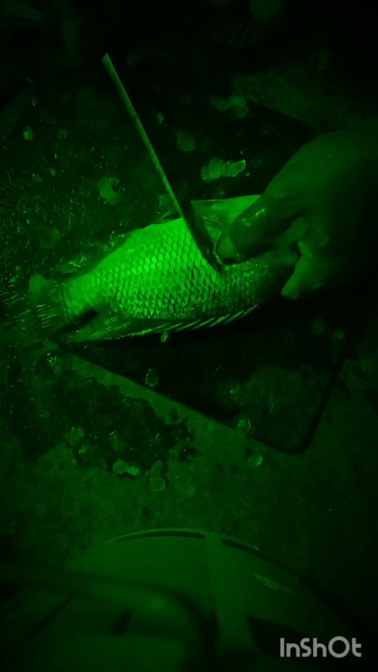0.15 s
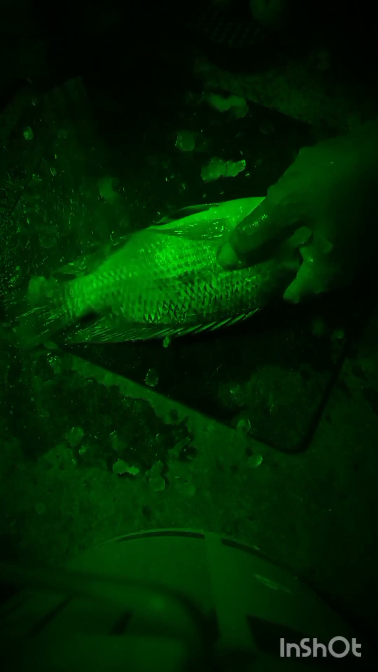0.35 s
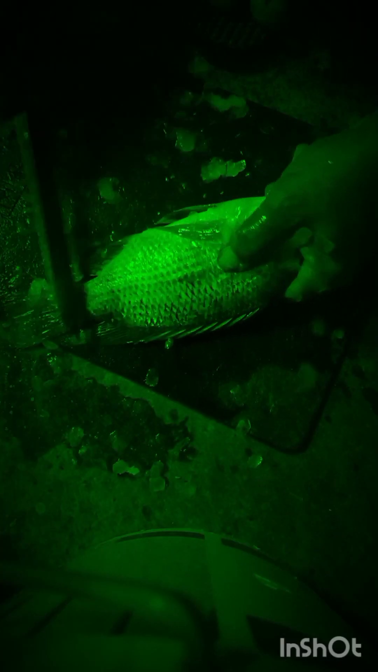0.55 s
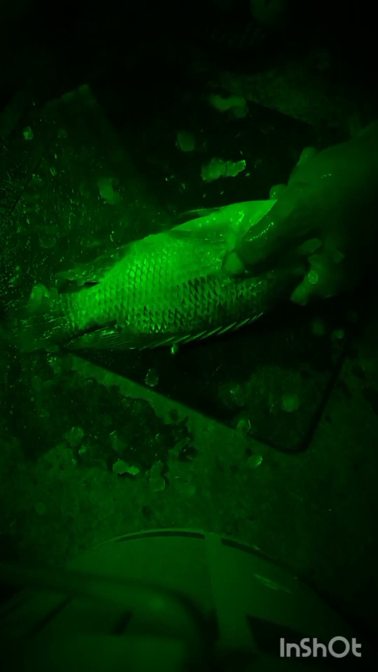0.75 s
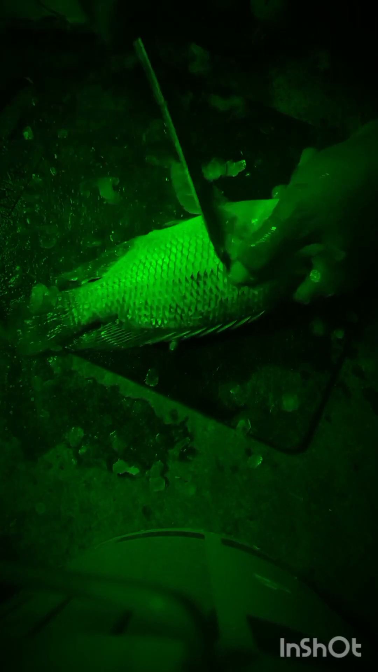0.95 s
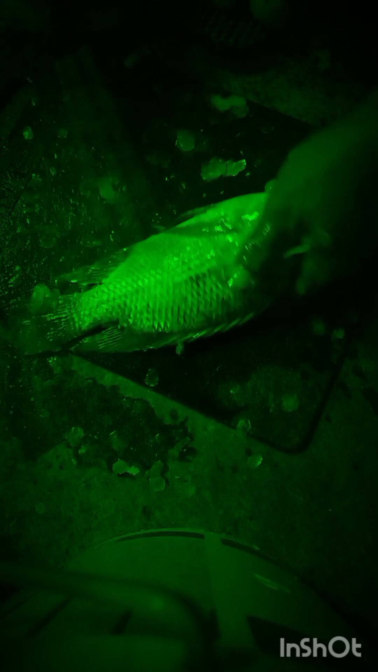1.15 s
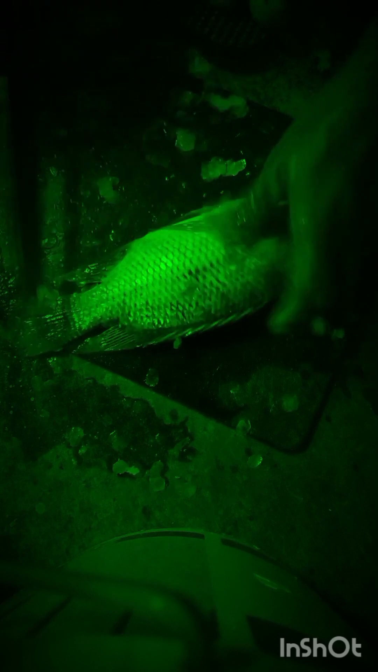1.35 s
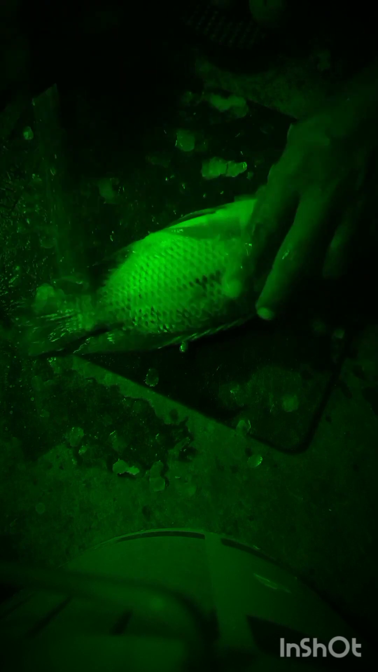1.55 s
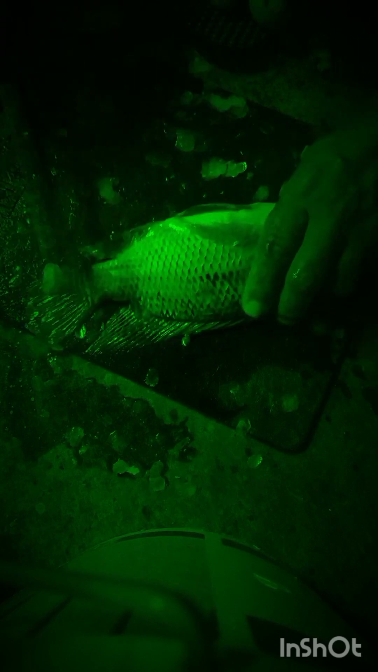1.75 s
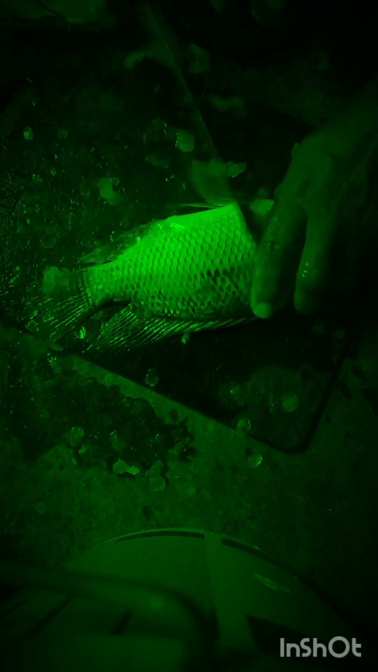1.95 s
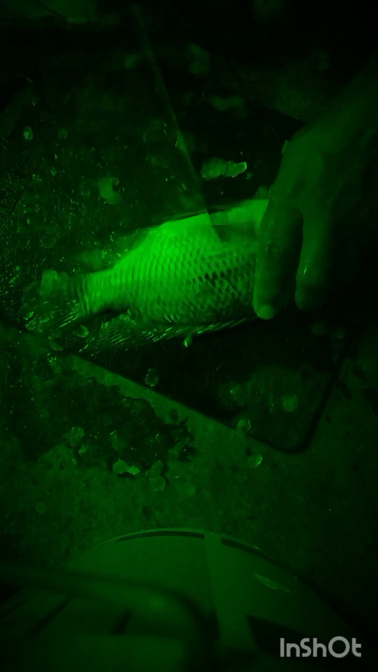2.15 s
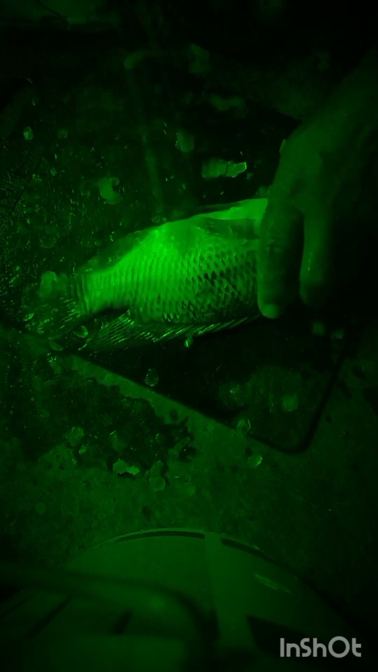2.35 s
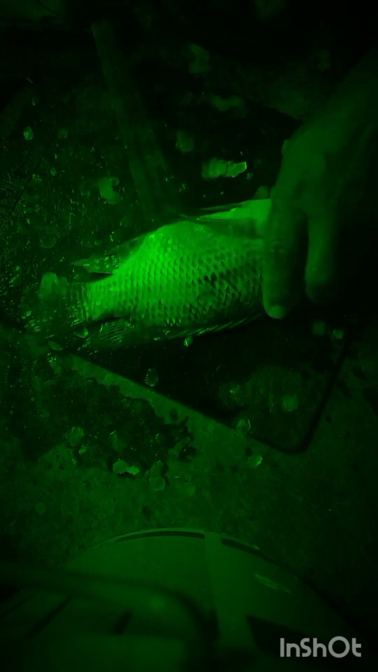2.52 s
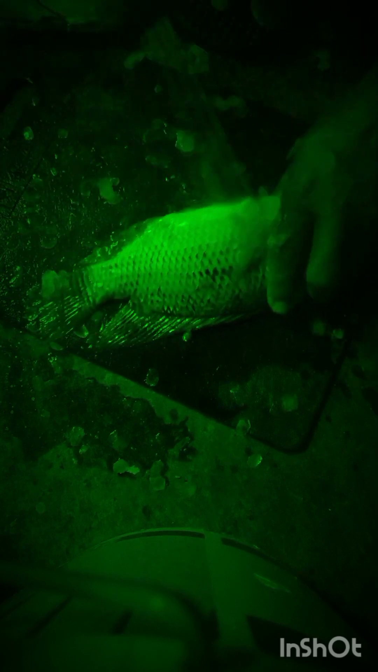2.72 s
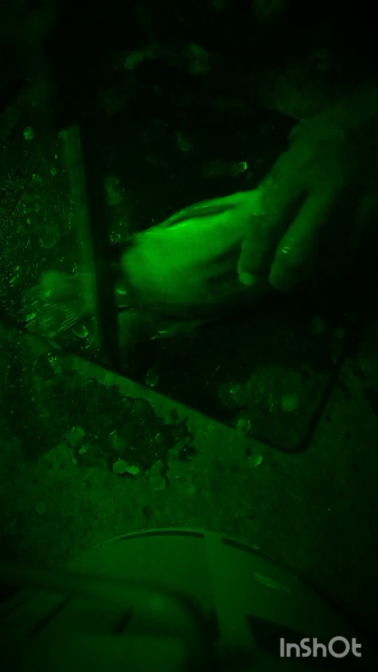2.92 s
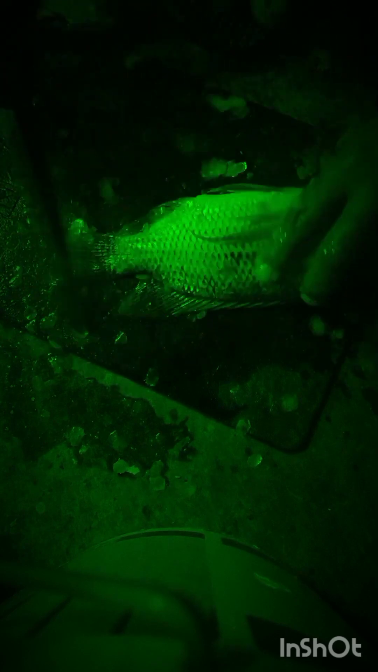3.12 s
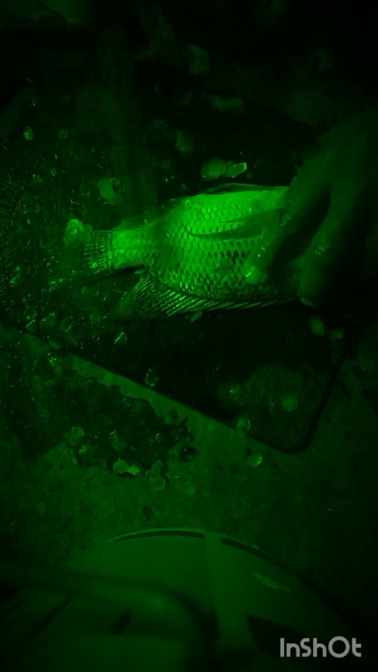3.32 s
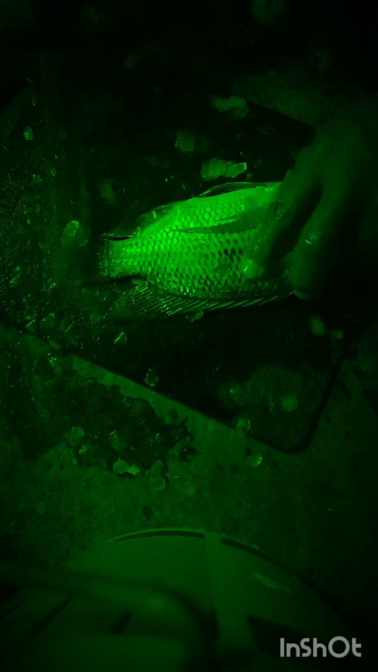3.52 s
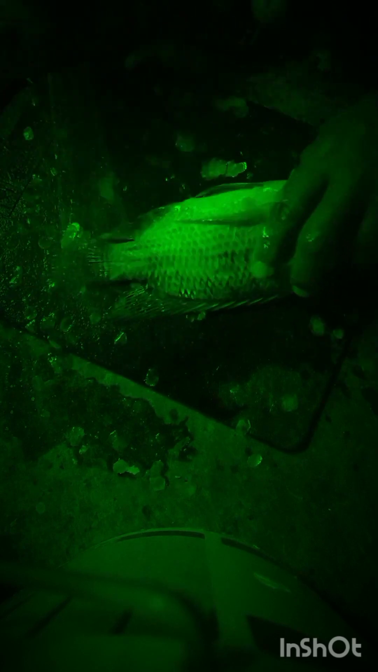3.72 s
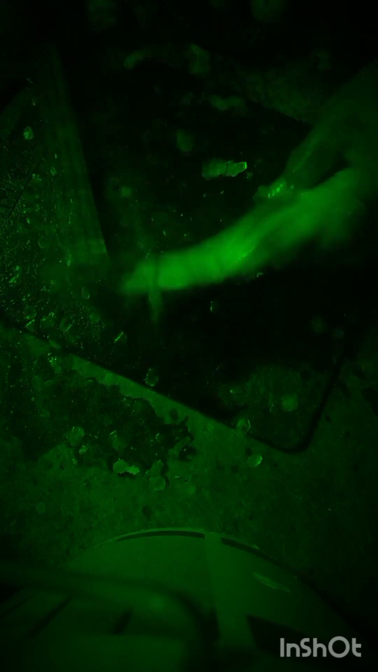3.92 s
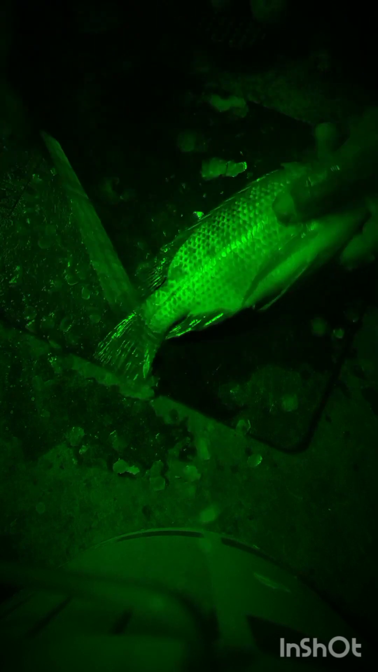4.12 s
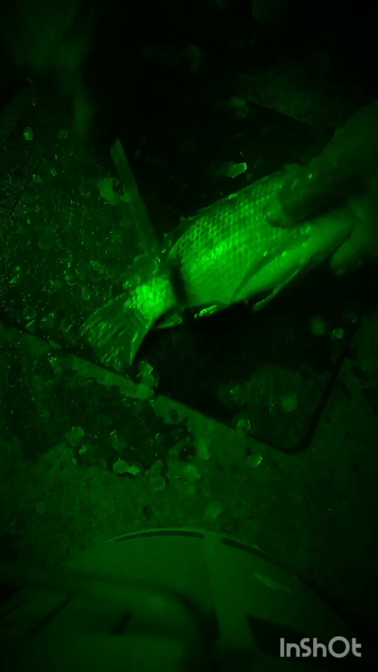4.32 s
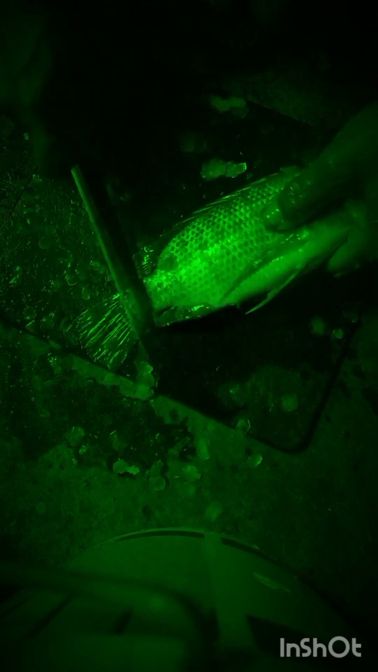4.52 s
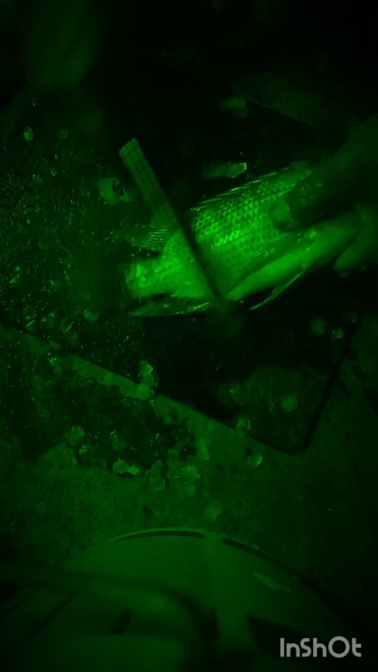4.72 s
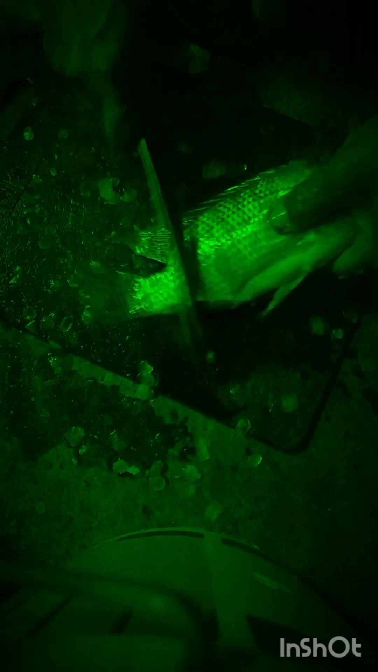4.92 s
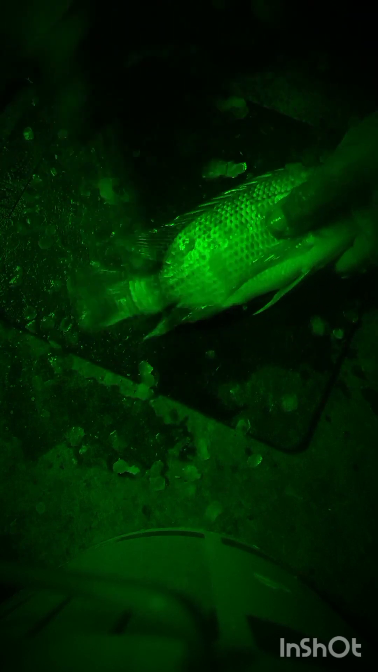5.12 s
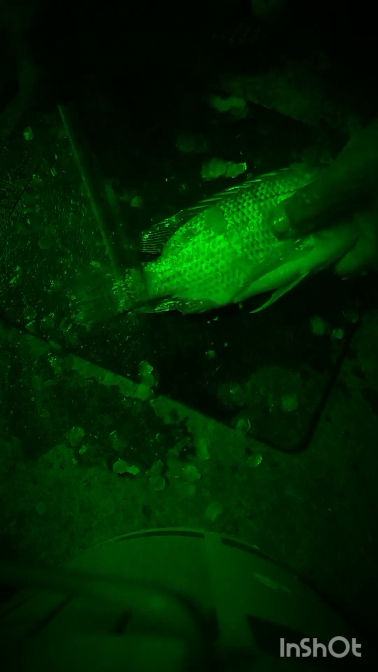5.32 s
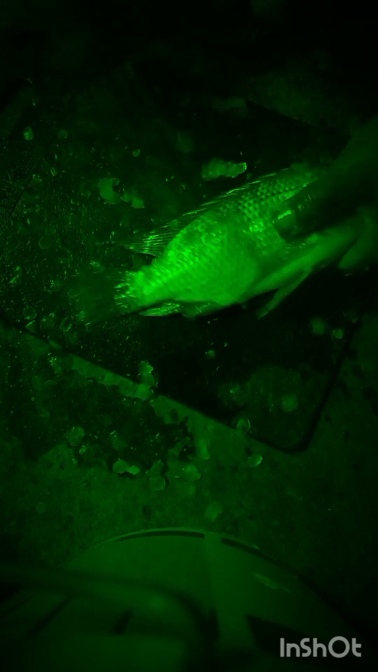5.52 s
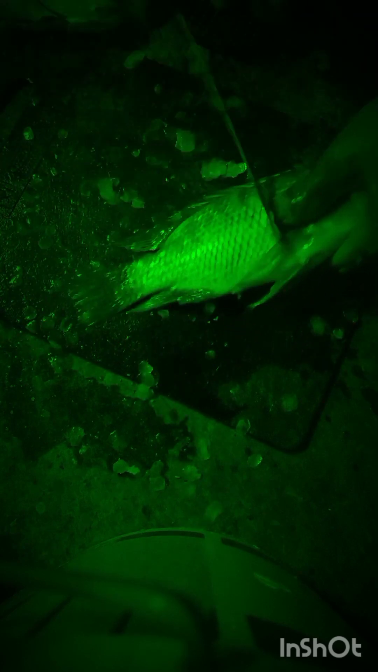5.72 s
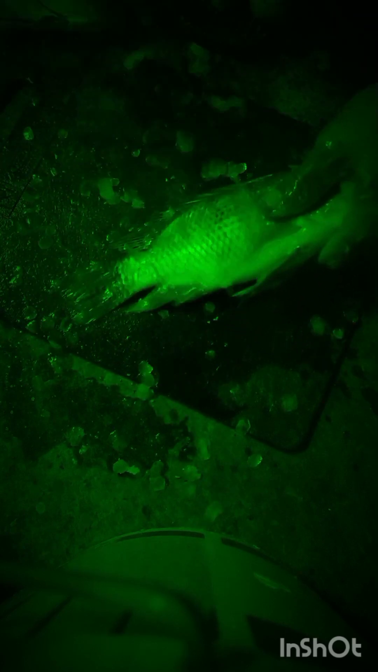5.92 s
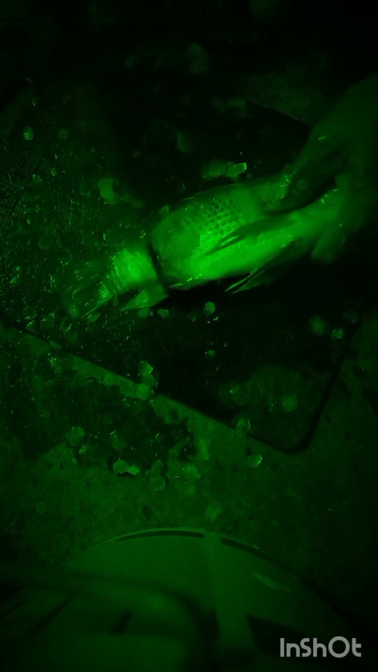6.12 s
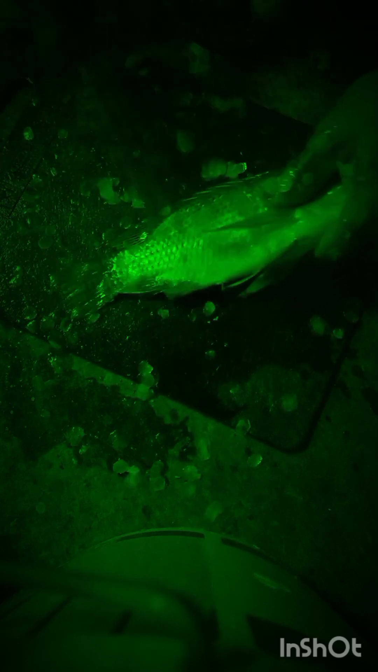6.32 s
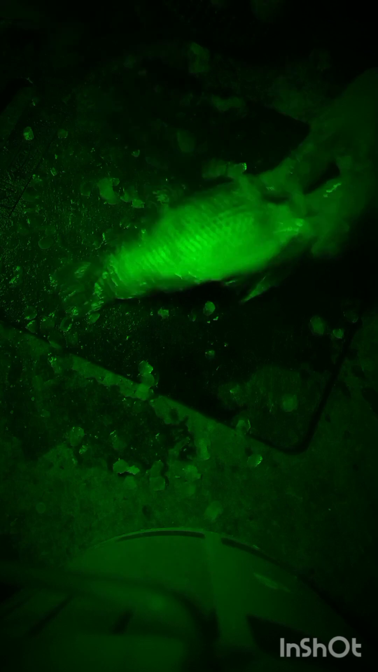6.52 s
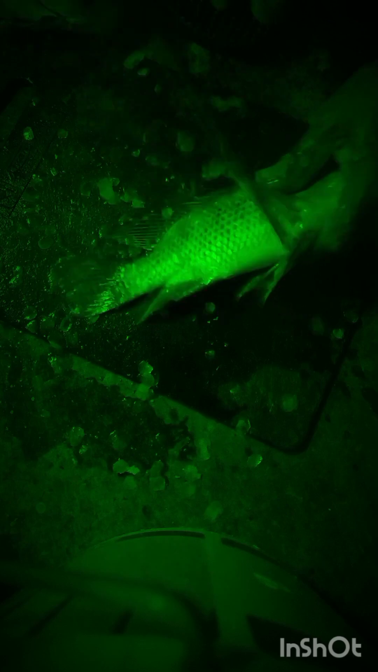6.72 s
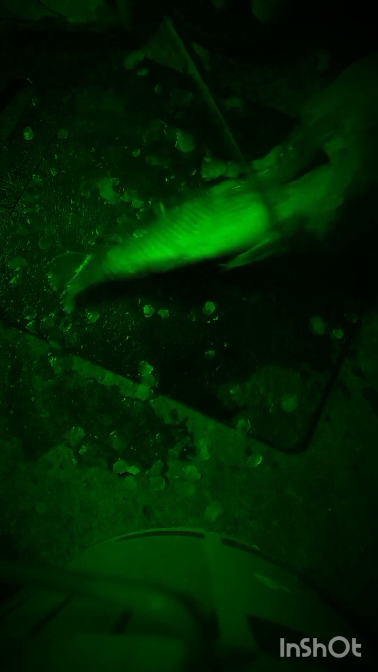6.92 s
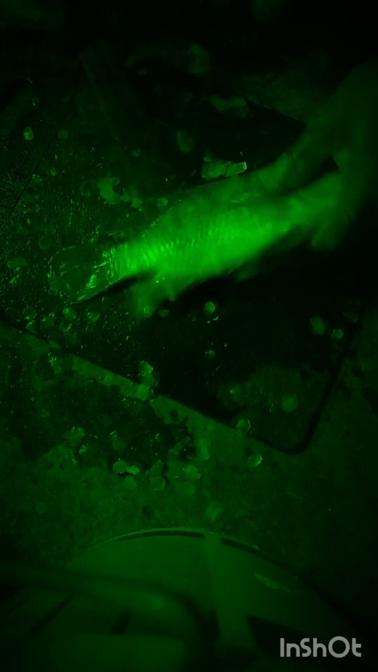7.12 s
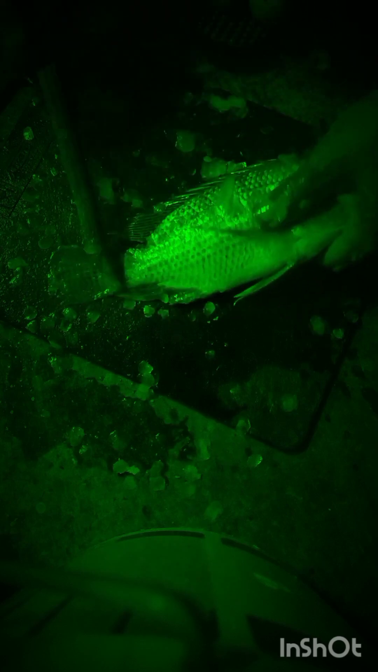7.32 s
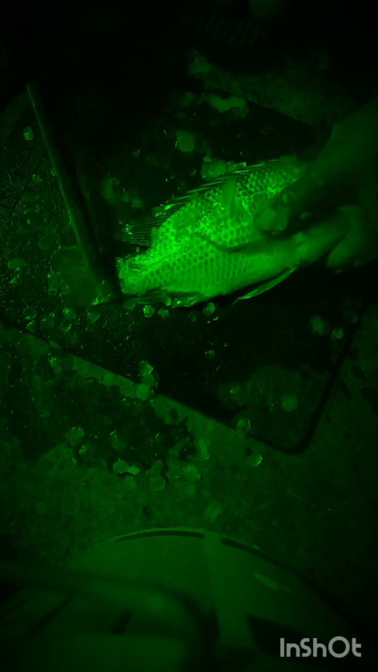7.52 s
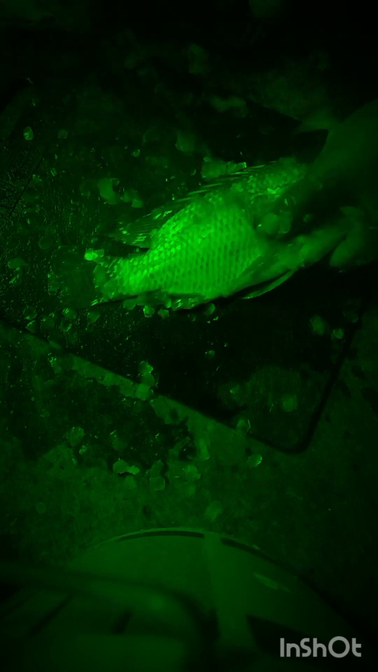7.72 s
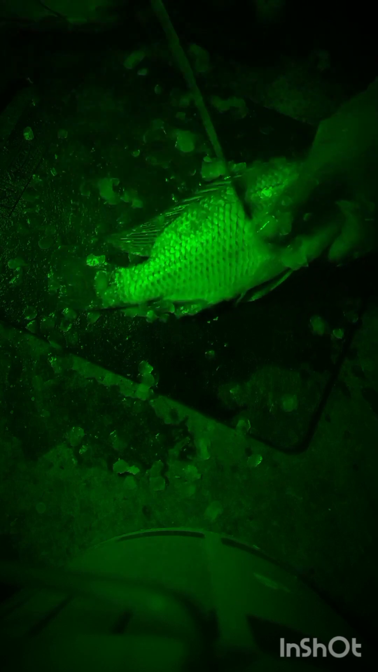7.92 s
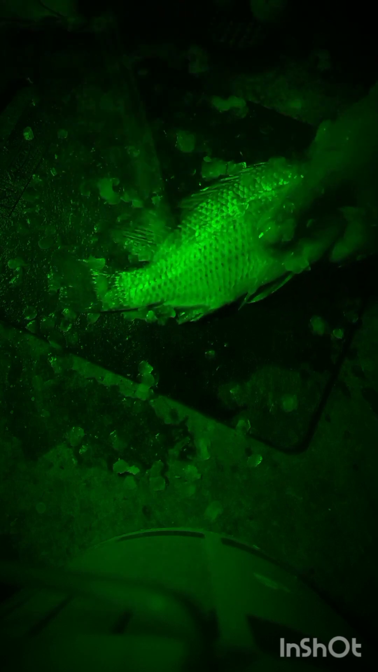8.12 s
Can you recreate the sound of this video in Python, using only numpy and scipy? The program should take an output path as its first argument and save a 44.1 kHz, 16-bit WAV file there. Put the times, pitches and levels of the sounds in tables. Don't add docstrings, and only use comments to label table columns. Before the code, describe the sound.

Outdoors at night, a knife scrapes scales off a fish in rapid short strokes, very close. Each stroke crackles with popping scales, makes the thin blade sing and gives the small wooden board a woody ring with a fleshy thump. The strokes pause and soften around the third second, then grow harder and denser. Insects throb steadily behind, with a faint far motor. Wide stereo, left thin and bright, right duller.

```python
import sys
import numpy as np
from scipy import signal
from scipy.fft import rfft, irfft, next_fast_len
from scipy.io import wavfile
from scipy.ndimage import uniform_filter1d, map_coordinates

SR = 44100
rng = np.random.default_rng(int(sys.argv[2]) if len(sys.argv) > 2 else 0)


def to_linear_factor(level_db):
    exponent = np.asarray(level_db, float) / 20
    return 10 ** exponent


def wrap_up_sound(samples):
    columns = np.atleast_2d(samples).T
    tamed = np.clip(columns, -1, 1)
    steps = np.round(tamed * 32767).astype(np.int16)
    wavfile.write(sys.argv[1], SR, steps)


N = 359756
TIME_S = np.arange(N) / SR

# peak in seconds, level in dB, rise in ms, fall in ms.
PUSHES = [(0.137, -32.5, 31, 66), (0.192, -29.5, 60, 27), (0.416, -30, 46, 65), (0.723, -31, 55, 29),
          (0.949, -30, 33, 61), (1.222, -37, 54, 51), (1.638, -32, 14, 53), (1.982, -34.5, 38, 25),
          (2.196, -28.5, 23.3, 31), (2.432, -37, 24, 37), (2.657, -45.5, 41, 26), (3.187, -37, 30, 51),
          (3.394, -34, 74, 41), (3.63, -31, 40, 58), (3.87, -42, 144, 100), (4.41, -28.5, 59.5, 46),
          (4.691, -23, 57, 39), (4.919, -32, 63, 120), (5.196, -29, 44, 51), (5.272, -23.5, 115, 25.5),
          (5.462, -29.5, 61, 86), (5.72, -32.5, 43, 51), (5.765, -24.5, 28, 26), (5.966, -24.5, 23.6, 43),
          (6.219, -29, 17, 48.5), (6.476, -31.5, 32.5, 23), (6.69, -32, 39, 42), (6.919, -35, 23, 52),
          (7.18, -35.5, 35, 47), (7.439, -31.5, 47, 47), (7.689, -29, 77, 39), (7.957, -24.5, 66, 18)]
PUSH_STEEL_DB = [3, 1, 5, 1.5, 0.5, 5, -4, 4.5, 4.5, 3.5, 6, 1.5, -5, -5, -2, 5.3, -6, 2, -5, -2, -1, -4,
                 -1, -0.5, -4, 14, -20, -3.5, 2, -10.5, -5.5, 0]
STEEL_HISS_HZ = (4640, 7600)
# peak in seconds, level in dB, length in ms, board level in dB.
RETURNS = [(0.034, -45, 85, -67), (0.31, -44.5, 124, -46), (0.586, -48.5, 270, -48),
           (0.844, -50.5, 260, -54), (1.081, -47.5, 65, -52.5), (1.776, -50, 70, -59),
           (2.1, -47.5, 150, -63), (2.353, -44.5, 73, -58.5), (2.553, -54.5, 190, -92),
           (3.059, -46, 70, -40), (3.777, -46.5, 69, -46), (3.949, -43.5, 43, -45.5),
           (4.059, -48.5, 48, -52), (4.577, -28.5, 85, -51), (4.812, -32, 90, -40.5), (5.063, -29, 42, -55),
           (5.364, -39.5, 75, -36), (5.61, -38, 53, -40), (5.873, -42, 94, -50.5),
           (6.109, -35.5, 53, -50.5), (6.382, -46, 98, -63), (6.599, -36.5, 65, -57.5),
           (6.831, -36.5, 77, -57), (7.072, -48, 61, -56), (7.313, -54, 92, -60), (7.567, -37.5, 78, -38),
           (7.83, -48, 86, -45), (8.104, -47, 140, -62)]
# peak in seconds, level in dB, fall in ms, lean to the left in dB.
CATCHES = [(0.512, -50, 10, 21), (0.531, -38, 8.4, 7), (0.611, -48, 17, 20), (0.907, -32.5, 4.9, 9),
           (1.183, -34, 9.9, 0), (1.316, -51, 10, 12), (1.436, -63, 13, 18), (1.705, -40.5, 14, 17),
           (2.39, -41.5, 12, 8), (2.412, -43, 11, -9), (2.587, -50.5, 13, 15), (2.622, -47, 7.1, 11),
           (2.696, -41.5, 68, -2.5), (2.971, -43.5, 52, -1.5), (3.036, -43, 12, -3), (3.35, -36.5, 4.1, 12),
           (4.266, -40, 37, 7), (4.54, -30, 27, 9), (4.845, -26, 20, 10.5), (4.989, -27.5, 9.8, 10.5),
           (5.1, -29.5, 30, 3.5), (5.387, -34.5, 8.1, 8), (5.508, -31, 11, 3), (5.562, -42, 10, 0),
           (5.632, -34, 13, 1), (6.171, -33.5, 32, 2), (7.104, -38, 15, 3), (7.343, -46.5, 20, 14),
           (7.787, -37, 18, 3), (7.988, -36.5, 13, 9)]
# time in seconds, centre of the board's ring in Hz,
# flesh under the edge in dB, brightness of the pushes in dB.
SPOTS = [(0.15, 850, 4.5, 3), (0.45, 980, -3, -9), (0.96, 1000, -2, -11.5), (1.25, 845, -0.5, -12),
         (1.6, 980, -1.5, -13), (2.0, 740, 3, -9), (2.3, 710, 4.5, 7), (2.7, 900, 4.5, 9),
         (3.17, 850, -17, -22), (3.4, 955, -6, -7), (3.9, 1020, -5.5, -16), (4.4, 1056, 0, -7.5),
         (5.2, 1077, -1, -7.5), (5.75, 1050, -5, -13), (6.2, 840, 4.5, -12), (7.2, 640, 4, -1),
         (7.43, 1010, -4.5, -2), (7.95, 1040, 1, -4.5)]
# frequency in Hz, level in dB.
SCALE_SPECTRUM = [(250, -16), (800, -10.5), (1600, -9), (2600, -4), (16000, 6.5)]
# frequency in Hz, width in Hz, level in dB.
STEEL_MODES = [(5220, 175, 1), (6684, 190, 9), (10770, 89, 1.5)]
# time in seconds, peak in dB, tone in Hz.
SNAPS = [(0.0966, -41, 6780), (0.1068, -29, 6000), (0.1155, -25, 6720), (0.1954, -26, 5520),
         (0.3071, -32, 6800), (0.389, -28, 5240), (0.4144, -22, 6970), (0.6713, -28, 5200),
         (0.7261, -25, 6090), (0.9037, -33, 6020), (1.209, -25, 6250), (1.6261, -30, 5310),
         (1.9793, -31, 5400), (2.1813, -24, 5490), (2.1878, -24, 6450), (2.1908, -23, 5150),
         (2.3405, -35, 6800), (2.4088, -35, 6460), (2.4268, -33, 6100), (3.3791, -33, 4070),
         (4.2606, -38, 6470), (4.3963, -26, 6800), (4.4582, -32, 6550), (4.5405, -20, 6160),
         (4.6358, -28, 6130), (4.6497, -23, 6230), (4.6878, -19, 5560), (4.6936, -18, 6700),
         (4.7546, -32, 6680), (4.7829, -27, 6690), (4.803, -23, 6680), (4.8383, -24, 6050),
         (4.8554, -23, 5260), (4.9076, -25, 5320), (4.966, -27, 5930), (4.9865, -24, 5220),
         (5.0628, -29, 6710), (5.0992, -26, 6770), (5.184, -26, 6700), (5.2564, -23, 5220),
         (5.3521, -33, 6830), (5.4265, -29, 5150), (5.4745, -23, 5420), (5.5048, -27, 5250),
         (5.5118, -27, 5970), (5.5288, -30, 5980), (5.5617, -34, 3780), (5.7622, -22, 5540),
         (5.7978, -36, 6400), (5.9318, -26, 5220), (5.9627, -24, 6760), (6.1698, -34, 6700),
         (6.4521, -29, 3920), (6.6487, -36, 5840), (6.9056, -34, 6680), (7.1027, -29, 6040),
         (7.157, -31, 5860), (7.5656, -20, 6420), (7.7023, -27, 6600), (7.9608, -22, 5570)]
# time in seconds, peak in dB.
TICKS = [(0.0304, -41), (0.2069, -34), (0.5089, -40), (0.5134, -40), (0.5302, -40), (0.5801, -41),
         (0.6127, -44), (0.7323, -31), (0.7455, -37), (0.8362, -44), (1.1282, -43), (1.2046, -35),
         (1.316, -47), (1.7092, -39), (2.0393, -48), (2.6221, -47), (2.6419, -44), (2.696, -42),
         (3.3536, -39), (4.7189, -31), (4.73, -32), (4.9263, -28), (4.9945, -31), (5.0664, -31),
         (5.1034, -30), (5.4798, -29), (6.1109, -38), (6.5775, -39), (6.5834, -37), (6.6002, -39),
         (6.7275, -38), (6.812, -38), (6.8193, -39), (6.845, -39), (6.9643, -42), (7.1089, -41),
         (7.3435, -43), (7.4758, -39), (7.543, -37), (7.5472, -36), (7.5619, -34), (7.7892, -40),
         (7.9935, -36), (8.1064, -43)]
# peak in seconds, board level in dB, rise in ms, blade level in dB.
PRESSES = [(0.18, -32.5, 61, -42.5), (0.428, -30, 53, -43.5), (0.699, -32, 32, -42.5),
           (0.955, -35.5, 48, -40), (1.224, -42, 68, -47), (1.32, -80, 44, -68), (1.618, -28, 30.5, -50),
           (1.958, -40, 40, -45), (2.199, -49.5, 19, -42), (2.428, -51.5, 19, -42), (2.705, -54.5, 72, -49),
           (2.99, -59, 35, -57), (3.154, -30.5, 2.1, -35.5), (3.386, -33, 35, -43),
           (3.642, -24.5, 45, -41.5), (3.867, -33, 59, -47), (4.411, -39, 22, -42), (4.653, -31, 22, -38),
           (4.93, -27, 19.6, -33), (5.213, -27, 46, -34.5), (5.446, -27.5, 17, -36.5), (5.7, -28, 20, -40),
           (5.976, -43.5, 32, -40), (6.217, -39, 43, -40), (6.464, -45, 25, -39), (6.68, -48, 29, -38.5),
           (6.92, -49, 23, -44), (7.194, -54.5, 42, -47.5), (7.432, -31.5, 34, -46),
           (7.663, -26.5, 20.5, -37), (7.906, -31.5, 20, -42.5)]
# frequency in Hz, width in Hz, level in dB.
BOARD_LOW = [(430, 190, -5), (669, 115, 3.5), (784, 48, 11), (850, 235, 5.5)]
BOARD_HIGH = [(955, 27, -2), (1030, 15.7, 1), (1098, 74, -2.5), (1760, 1230, -6.5)]
# frequency in Hz, width in Hz, level in dB.
BOARD_RADIATION = [(900, 750, 0)]
# frequency in Hz, level in dB.
FLESH_SPECTRUM = [(50, -6), (125, 1.5), (175, -7), (300, -1.5), (480, -0.5), (800, -13)]
# time in seconds, pitch in Hz.
BLADE_PITCH = [(0, 2630), (0.7, 2640), (1.4, 2630), (2.3, 2690), (3.05, 2590), (3.2, 2780), (3.3, 2570),
               (4.3, 2680), (4.8, 2583), (5.65, 2670), (5.94, 2420), (6.4, 2440), (6.9, 2535), (7.4, 2510),
               (8.15, 2550)]
# time in seconds, peak in dB, pitch in Hz.
PINGS = [(0.1584, -41, 2570), (0.676, -26.5, 2610), (0.9327, -37, 2700), (0.9512, -34, 2750),
         (1.918, -40, 2680), (2.1932, -30, 2500), (2.387, -38, 2520), (2.4272, -20.5, 2604),
         (2.4523, -35, 2670), (3.155, -42, 2640), (3.1667, -45, 2750), (3.5944, -43, 2600),
         (3.6348, -30, 2560), (4.2697, -35.5, 2720), (4.546, -14, 11140), (4.577, -28, 2560),
         (4.6543, -28, 2600), (4.8383, -42, 2400), (4.933, -27, 2520), (5.202, -36, 2560),
         (5.442, -45, 2650), (5.9325, -35, 2460), (5.9554, -43, 2490), (5.9728, -32, 2360),
         (6.1722, -30, 2560), (6.2148, -32, 2400), (6.454, -35, 2520), (6.6503, -43, 2540),
         (6.675, -26, 2500), (6.9048, -31, 2480), (7.1881, -29, 2475), (7.6261, -40, 2450),
         (7.652, -43, 2470), (7.6873, -38, 2470), (7.7032, -28, 2380), (7.8997, -36, 2550),
         (7.9164, -31, 2460), (7.9364, -27, 2400)]
# time in seconds, peak in dB, board tone in Hz.
KNOCKS = [(0.098, -53, 790), (0.15, -51, 700), (0.182, -35, 1040), (0.323, -44, 960), (0.419, -41, 670),
          (0.667, -38.5, 800), (0.696, -35.5, 706), (1.159, -46, 840), (1.392, -58, 775),
          (1.584, -25.5, 803), (1.608, -28.5, 940), (1.634, -32, 930), (2.426, -45.5, 694),
          (3.034, -51, 860), (3.087, -39.5, 850), (3.111, -50, 845), (3.15, -34, 850), (3.174, -49, 846),
          (3.346, -60, 714), (3.366, -38.5, 764), (3.551, -45, 746), (3.604, -38.5, 720), (3.79, -42, 950),
          (3.844, -38.5, 670), (3.867, -38, 800), (4.045, -45.5, 885), (4.068, -48, 850),
          (4.404, -41.5, 1090), (4.623, -42, 1090), (4.639, -31, 1060), (4.902, -33, 1050),
          (4.918, -31, 848), (5.165, -36, 820), (5.2, -23, 994), (5.224, -24, 1043), (5.375, -39, 1040),
          (5.434, -26, 1090), (5.456, -24, 1090), (5.684, -40, 716), (5.694, -25.5, 1030),
          (5.716, -24, 1000), (5.941, -38.5, 960), (6.174, -39, 940), (6.616, -47, 493), (6.913, -46, 560),
          (7.351, -47, 975), (7.399, -41, 715), (7.421, -28, 930), (7.629, -31, 890), (7.65, -30.5, 960),
          (7.897, -34, 990)]
# frequency in Hz, level in dB.
CICADAS = [(2500, -49), (4500, -22), (5500, -11), (6200, -3.5), (6590, 5.5), (6850, 0.5), (7200, -4),
           (7500, -43)]
KATYDIDS = [(5000, -19), (7900, -26), (8600, 1), (9210, -3.5), (10100, -2), (11400, -5.5), (12000, -22),
            (16000, -33)]
MOTOR = [(25, -31), (84, 5), (108, -6.5), (131, -3.5), (152, -19), (800, -25.5), (1200, -25), (2600, -34.5)]
# frequency in Hz, gain in dB.
LEFT_PORT = [(100, -18.5), (200, -11), (400, -2.5), (1000, -4), (2000, -1.5), (5500, -3.5), (6700, 1.5),
             (7300, -10.5), (7900, -11.5), (10000, -7.5), (13000, -4), (15500, -9.5)]
RIGHT_PORT = [(60, 2.5), (700, 3), (1200, -6.5), (3000, -2), (4000, -18.5), (6800, -14), (7700, -80),
              (9000, -10.5), (11500, -6.5), (15500, -18.5)]
# frequency in Hz, share common to both.
ALIKE = [(100, 0.78), (400, 0.79), (1000, 0.32), (12000, 0.11)]


def scales():
    lean_db, bright_db = np.transpose(drags())[4:]
    left_db, right_db = 0.39 * lean_db, -0.85 * lean_db
    levels = swells(drags(), left_db - 0.27 * bright_db, right_db - 0.62 * bright_db,
                    left_db + 0.36 * bright_db, right_db + 0.3 * bright_db)
    levels = lingering(levels, t60=0.3, share_db=np.array([[-14], [-6], [-16], [-7]]))
    levels = lingering(levels, t60=0.98, share_db=np.array([[-27], [-24], [-30], [-28]]))

    clumps = to_linear_factor(1.8 * wobble(70))
    gate = crackle(rate=1500, spread_db=1.6, life_s=0.001, bed=1.5) * clumps
    pops = pair(gate, lambda hz: to_linear_factor(along(SCALE_SPECTRUM, hz)) * (1 + 0.73 * modes(STEEL_MODES)(hz)))
    spectrum = signal.stft(pops, nperseg=256)[2]
    patches = uniform_filter1d(rng.standard_normal(spectrum.shape[1:]), size=3, axis=0)
    patches = uniform_filter1d(patches, size=8, axis=1)
    pops = unit(signal.istft(spectrum * to_linear_factor(3.1 * unit(patches)), nperseg=256)[1][:, :N])

    dull = filtered(pops, lambda hz: 1 / (1 + (hz / 7600) ** 8))
    bright = pops - dull
    low_hz, high_hz = STEEL_HISS_HZ
    hiss = filtered(dull, lambda hz: 1 / (1 + (low_hz / (hz + 1)) ** 8) / (1 + (hz / high_hz) ** 12))
    steel = to_linear_factor(np.interp(TIME_S, np.transpose(PUSHES)[0], PUSH_STEEL_DB))
    return to_linear_factor(2.5) * (levels[:2] * (dull + (steel - 1) * hiss) + levels[2:] * bright)


def drags():
    pushes = [(*row, 3, spot(row[0], column=3)) for row in PUSHES]
    rise_share = 0.67
    pulls = [(s, db, rise_share * ms, (1 - rise_share) * ms, 5.5, -1.5 + 0.25 * (db + 35.5))
             for s, db, ms, _ in RETURNS]
    catches = [(s, db, 8.4, ms, lean, -5.5 + 0.12 * (db + 62.0)) for s, db, ms, lean in CATCHES]
    return pushes + pulls + catches


def spot(s, column):
    columns = np.transpose(SPOTS)
    return np.interp(s, columns[0], columns[column])


def snaps():
    out, t = np.zeros((2, N + SR)), np.arange(SR // 20) / SR
    lag_s, rise_s, t60 = 0.0014, 0.001, 0.009
    stiff = [(s + lag_s, db) for s, db, _ in SNAPS]
    small = [(s, db + 4) for s, db in TICKS]
    rustle = to_linear_factor(-23 - 10 * t / t60)
    envelope = (1 - np.exp(-t / rise_s)) * (to_linear_factor(-60 * t / t60) + rustle)
    for s, db in stiff + small:
        crack = envelope * np.sign(rng.standard_normal((2, len(t))))
        out[:, round(s * SR):][:, :len(t)] += to_linear_factor(db + 11 + np.array([[3], [-3]])) * crack

    def crack_colour(hz):
        return to_linear_factor(along(SCALE_SPECTRUM, hz)) / (1 + (2500 / (hz + 1)) ** 2) / (1 + (hz / 11000) ** 2)

    tones = rings(SNAPS, t60=0.014, rise_s=0.00019, right_leads=0)
    return filtered(out[:, :N], crack_colour) + to_linear_factor(-5) * tones


def board():
    s, board_db, _, _, blade_db = np.transpose(presses())
    flesh_db = -46.5 + 0.67 * (board_db + 41.0) + 0.29 * (blade_db + 41.5) + spot(s, column=2)
    high = np.clip((spot(s, column=1) - 650) / 450, 0.03, 0.97)
    struck = swells(presses(), 10 * np.log10(1 - high), 10 * np.log10(high), flesh_db - board_db)
    low_level, high_level, thump = lingering(struck, t60=0.28, share_db=-10.5)
    slips = crackle(rate=200, spread_db=3.0, life_s=0.0028, bed=0.92)

    def blunt(table):
        return lambda hz: (modes(table)(hz) * modes(BOARD_RADIATION)(hz)
                           / (1 + (hz / 1700) ** 4) / (1 + (480 / (hz + 1)) ** 4))

    wood = low_level * pair(slips, blunt(BOARD_LOW)) + high_level * pair(slips, blunt(BOARD_HIGH))
    return to_linear_factor([[-9], [-6.5]]) * wood + to_linear_factor(-0.33) * thump * pair(1., colour(FLESH_SPECTRUM))


def presses():
    pushes = [(s, db, ms, 81.3 - 0.7 * ms, sing) for s, db, ms, sing in PRESSES]
    lag_s = 0.0087
    pulls = [(s + lag_s, press, 0.68 * ms, 0.87 * ms, db - 14) for s, db, ms, press in RETURNS]
    return pushes + pulls


def blade():
    pitch_hz = np.interp(TIME_S, *np.transpose(BLADE_PITCH)) + 38 * wobble(20)
    turn = np.exp(2j * np.pi * np.cumsum(pitch_hz) / SR)
    kicks = pair(crackle(rate=330, spread_db=3.0, life_s=0.0036, bed=1.7), np.ones_like) / turn
    song = unit(np.real(turn * narrowed(kicks, width_hz=226)))
    flare = unit(np.real(turn * narrowed(kicks, width_hz=590)))
    sings = singing()
    pressed = swells(sings, np.zeros(len(sings)))
    level = lingering(lingering(pressed, t60=0.42, share_db=-4.0), t60=0.8, share_db=-27)
    level = level * to_linear_factor(2 * wobble(25))
    pings = to_linear_factor(-4.5) * rings(PINGS, t60=0.081, rise_s=0.00048, right_leads=0.44)
    return to_linear_factor([[-5], [-2.6]]) * (level * song + to_linear_factor(-6.5) * np.sqrt(pressed * level) * flare) + pings


def singing():
    full_ms = 21
    loads = [(s + max(full_ms - rise, 0) / 1000, db, max(rise, full_ms) + 0.47, 0.75 * fall)
             for s, _, rise, fall, db in presses()]
    return loads + [(s, db - 24.5, 8.4, ms + 72) for s, db, ms, _ in CATCHES]


def knocks():
    near = rng.normal(0, 1, (len(KNOCKS), 2))
    sides, edge = [], []
    for (s, db, hz), (d, g) in zip(KNOCKS, near):
        sides += [(s, db - 14.5 + 2.5 * g, hz * (1 + k * (0.12 + 0.03 * d))) for k in (-1, 1)]
        edge += [(s, db - 12, hz * (ratio + 0.1 * d)) for ratio in (1.55, 2.2)]
    ring = rings(list(KNOCKS) + sides, t60=0.05, rise_s=0.0006, right_leads=1.88)
    return to_linear_factor(2) * (ring + rings(edge, t60=0.023, rise_s=0.0006, right_leads=1.88))


def night():
    throb_hz, peak_s = 8.72, 1.53
    throb_db = 3.5 * np.cos(2 * np.pi * throb_hz * (TIME_S - peak_s))
    throb_db = throb_db + 1.2 * wobble(1.9) + 2.1 * wobble(32)
    low = to_linear_factor(-59.0 + throb_db) * pair(1., colour(CICADAS))
    high = to_linear_factor(-62 + 1.5 * wobble(4.9)) * pair(1., colour(KATYDIDS))
    hum = to_linear_factor(-62.0 + 1.6 * wobble(3.0)) * pair(1., colour(MOTOR))
    return low + high + hum


def swells(rows, *offsets_db):
    power = np.zeros((len(offsets_db), N))
    bite, let_go = 1.61, 2.05
    for (s, db, rise_ms, fall_ms, *_), extra_db in zip(rows, np.transpose(offsets_db)):
        near = slice(max(round((s - 0.4) * SR), 0), round((s + 0.4) * SR))
        t = TIME_S[near]
        away = np.where(t < s, (s - t) / max(rise_ms - 4, 2), (t - s) / fall_ms) * 1000
        shape_db = db - 12 * away ** np.where(t < s, bite, let_go)
        power[:, near] += to_linear_factor(2 * shape_db) * to_linear_factor(2 * extra_db[:, None])
    return np.sqrt(power)


def lingering(level, t60, share_db):
    fall = to_linear_factor(-120 / t60 / SR)
    tail = signal.lfilter([1 - fall], [1, -fall], level ** 2)
    return np.sqrt(level ** 2 + to_linear_factor(2 * share_db) * tail)


def crackle(rate, spread_db, life_s, bed):
    sizes = to_linear_factor(spread_db * rng.standard_exponential(N).clip(0, 3))
    slips = (rng.random(N) < rate / SR) * sizes
    tail = to_linear_factor(-60 * np.arange(SR // 20) / SR / life_s)
    return bed + unit(signal.fftconvolve(slips, tail)[:N])


def rings(rows, t60, rise_s, right_leads):
    out, t = np.zeros((2, N + SR)), np.arange(SR // 6) / SR
    for s, db, hz in rows:
        tone = np.sin(2 * np.pi * hz * t + np.array([[0], [right_leads]]))
        envelope = to_linear_factor(db - 60 * t / t60) * (1 - np.exp(-t / rise_s)) ** 2
        out[:, round(s * SR):][:, :len(t)] += envelope * tone
    return out[:, :N]


def pair(gate, response):
    m = next_fast_len(N + SR // 2)
    hz = np.fft.rfftfreq(m, 1 / SR)
    common, *own = rfft(gate * rng.standard_normal((3, N)), m)
    share = np.clip(along(ALIKE, hz), 0, 1)
    mixed = np.sqrt(1 - share) * own + np.sqrt(share) * common
    return unit(irfft(mixed * response(hz), m)[:, :N])


def modes(table):
    def response(f):
        return sum((-1) ** k * to_linear_factor(db) * 1j * f * width / (centre * centre - f * f + 1j * f * width)
                   for k, (centre, width, db) in enumerate(table))
    return response


def colour(points):
    return lambda hz: to_linear_factor(along(points, hz))


def along(points, hz):
    f, v = np.transpose(points)
    return np.interp(np.log(hz + 1), np.log(f + 1), v)


def filtered(x, response):
    m = next_fast_len(N + SR // 2)
    return irfft(rfft(x, m) * response(np.fft.rfftfreq(m, 1 / SR)), m)[..., :N]


def narrowed(z, width_hz):
    pole = np.exp(-np.pi * width_hz / SR)
    return signal.lfilter([1], [1, -2 * pole, pole ** 2], z)


def wobble(rate):
    knots = rng.standard_normal(int(N * rate / SR) + 4)
    return map_coordinates(knots, [np.arange(N) * rate / SR])


def unit(x):
    return x / np.sqrt(np.mean(np.abs(x) ** 2) + 1e-20)


def scene():
    return scales() + snaps() + board() + blade() + knocks() + night()


def top_cut(x):
    return signal.sosfilt(signal.butter(12, 16810, fs=SR, output="sos"), x)


def record(dry):
    lead_s, top_hz = 23 / SR, 15850

    def ports(hz):
        left = to_linear_factor(along(LEFT_PORT, hz)) * np.exp(2j * np.pi * hz * lead_s)
        right = to_linear_factor(along(RIGHT_PORT, hz))
        return (hz < top_hz) / (1 + (52 / (hz + 1)) ** 4) * np.array([left, right])

    mix = filtered(dry, ports)
    return top_cut(mix)


dry = scene()
out = record(dry)
wrap_up_sound(out)
```